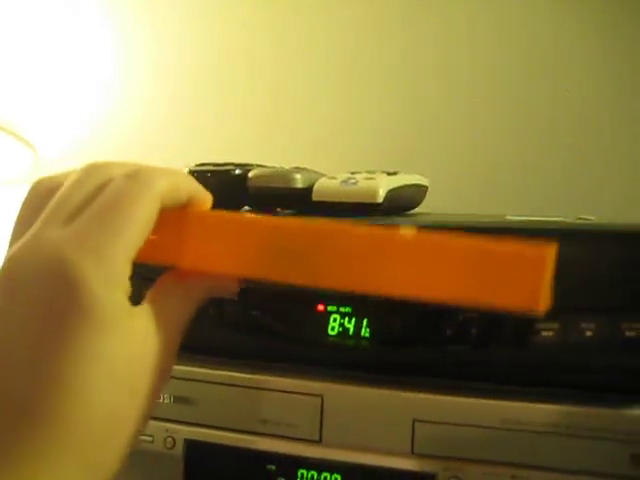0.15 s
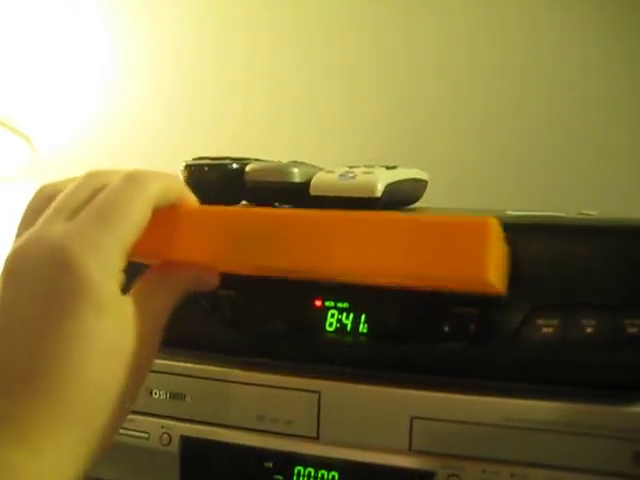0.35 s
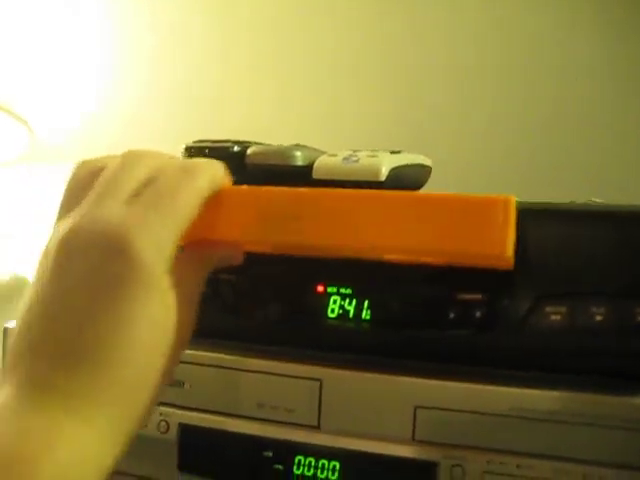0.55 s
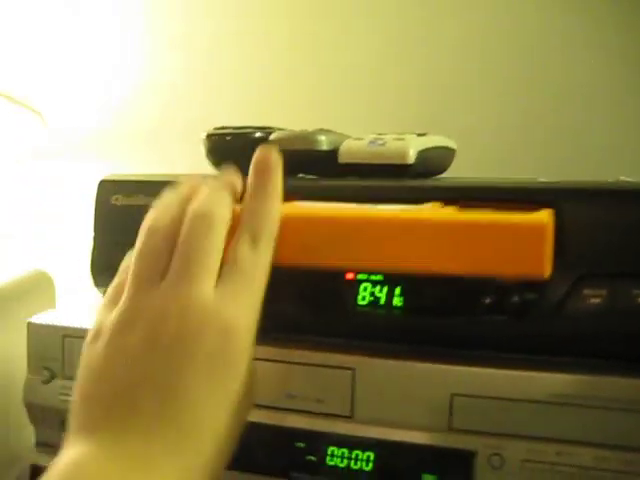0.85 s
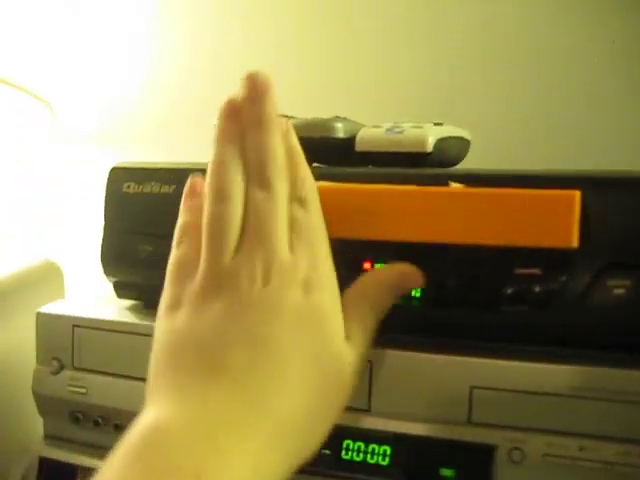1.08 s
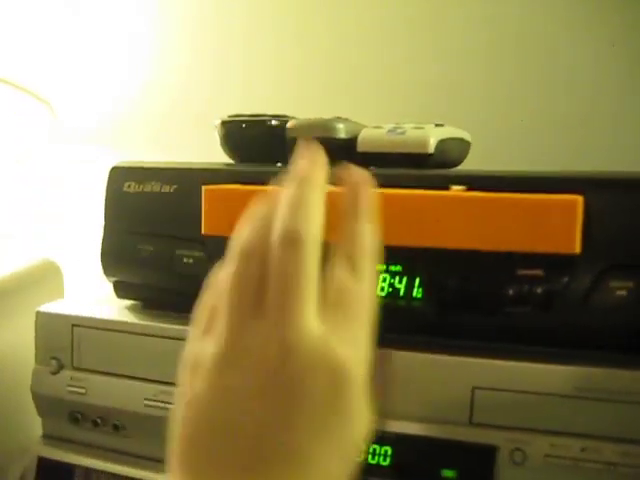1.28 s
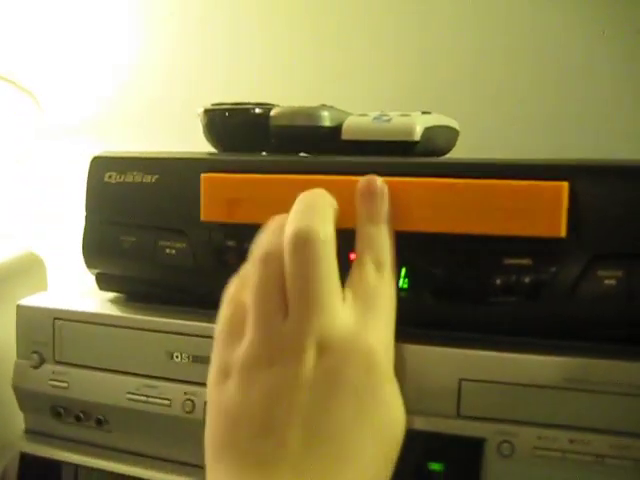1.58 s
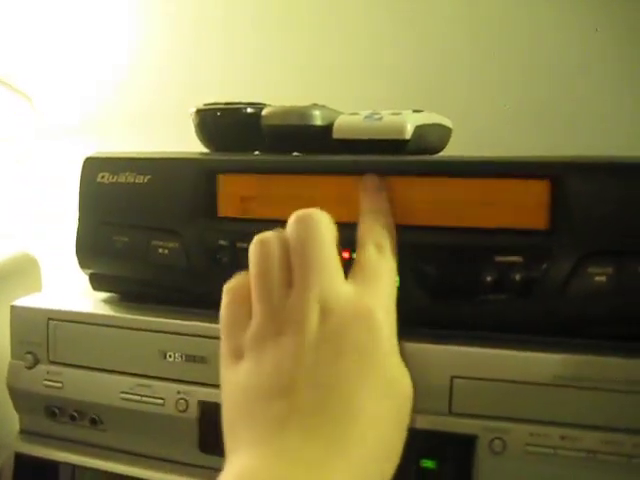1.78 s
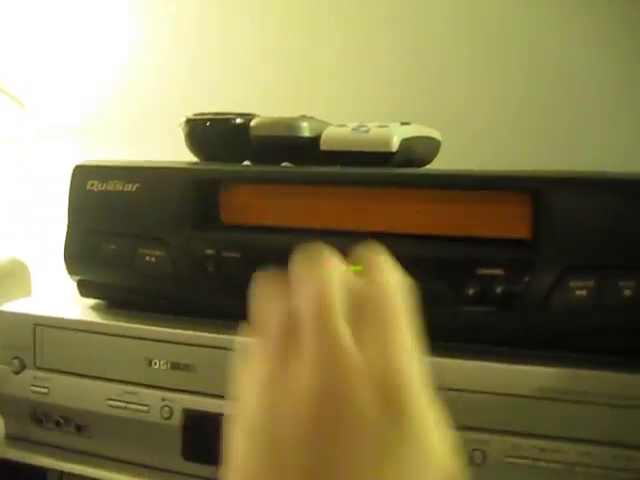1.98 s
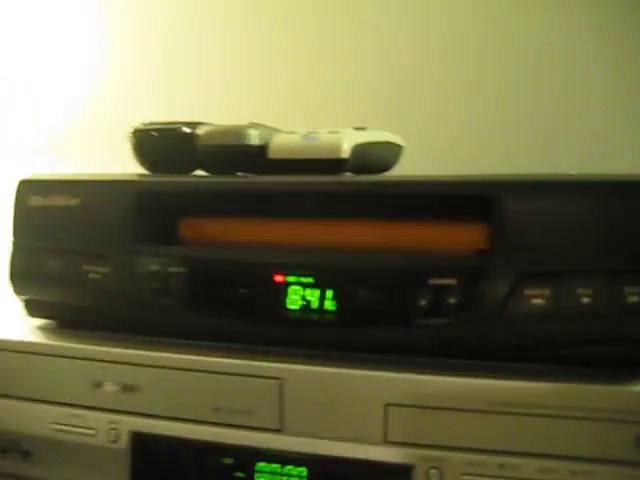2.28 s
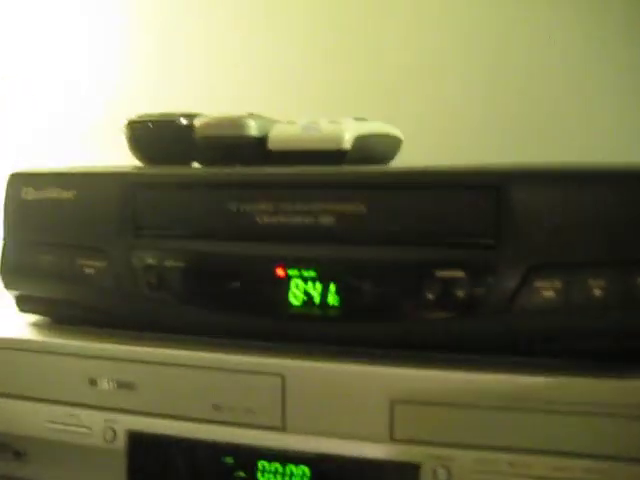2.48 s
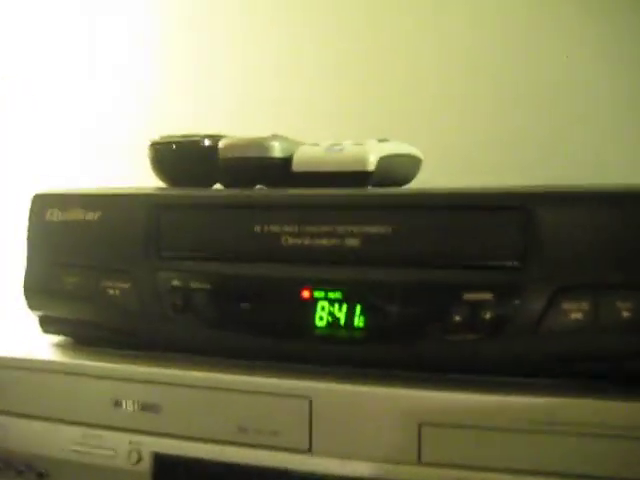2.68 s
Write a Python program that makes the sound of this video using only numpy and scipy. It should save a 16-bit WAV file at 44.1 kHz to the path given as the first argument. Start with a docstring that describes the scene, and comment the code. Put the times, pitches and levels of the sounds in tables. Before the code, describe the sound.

Video cassette loading into a tape machine: sharp plastic clacks, scraping, gear whirr, final clunks

```python
"""Loading a cassette into a video recorder

A plastic cassette is knocked against the slot, slid in and pushed home; the motor draws it in and
lowers it with rattles and clunks, the flap falls shut, and the motor whines on over a faint hum.
Contacts are decaying noise bursts; rattling, sliding and gears are trains of random tiny impacts.
Most of these excite the modes of shell and cabinet and a small room; a few dry ticks do not.
Struck modes are decaying sines, the motor and the hum unsteady sines."""
import sys
import numpy as np
from scipy import signal
from scipy.fft import rfft, irfft
from scipy.io import wavfile
from scipy.ndimage import uniform_filter1d

SR = 44100
rng = np.random.default_rng(int(sys.argv[2]) if len(sys.argv) > 2 else 0)


def generate_wav(sig):
    """Save sig (samples, or channels by samples) to the path in sys.argv[1] as 16-bit PCM at SR."""
    pcm = np.round(np.clip(np.atleast_2d(sig).T, -1, 1) * 32767).astype(np.int16)
    wavfile.write(sys.argv[1], SR, pcm)


N = 125685  # samples

# Levels are relative: later gains, resonances and filters act on them.
# centres of the contact bands: (frequency [Hz])
CONTACT_HZ = (350, 900, 2200, 4900, 11000)
# single sharp contacts: (time [s], ring t60 [s], level in each contact band [dB] x 5)
CLACKS = [(0.2165, 0.052, -10, -6, -10.5, -3, -16), (0.3237, 0.038, -22.5, -16.5, -11, -1, -10.5),
          (.603, 0.048, -51, -39, -28, -28, -28.5), (0.7392, 0.028, -10.5, 3.5, -10, 5.5, -12),
          (0.757, 0.13, -22, -11, -11.5, -11, -18.5), (.784, 0.066, -19, -14, -10, -1, -13),
          (1.106, 0.15, -17, -25, -27, -30.5, -44), (1.145, 0.043, -18.5, -14.5, -21, -28, -43),
          (1.576, 0.038, -45, -16, -27, -21.5, -31), (1.816, 0.1, -27, -17, -16.5, -16, -28.5),
          (2.357, 0.14, -19, -14.5, -16, -15.5, -30), (2.3803, 0.041, -10.5, -16, -4, -7, -8.5),
          (2.489, 0.099, -10, -13, -12, -14, -19), (2.571, 0.059, -20, -19, -15, -17.5, -23)]
# dry ticks, without cabinet or room; the one at 2.4893 s is the sharp onset of the 2.489 s clack:
# (time [s], ring t60 [s], level in each contact band [dB] x 5)
DRY_TICKS = [(1.272, 0.015, -36, -50, -68, -20, -30), (2.4893, 0.0084, -17, -13, -1, -2, -7),
             (2.615, 0.021, -35, -12, -14, -13, -27)]
CLACK_ATTACK_S, CLACK_GAIN_DB = 0.00018, -0.5
# spectrum edges: 60 Hz against the lowest contact band, 16 kHz against the highest
BASS_DB, TOP_DB = -37.5, -9.5

# parts that judder against each other: (time [s], length [s], level in each contact band [dB] x 5)
RATTLES = [(0.247, 0.038, -27.5, -23.5, -26, -26.5, -41.5), (0.354, 0.02, -24, -10.5, -23, -14, -32),
           (.383, 0.0085, -16.5, -14, -13.5, -9.5, -15.5), (.429, 0.025, -19, -17, -20.5, -16, -26.5),
           (0.505, 0.021, -21, -9.5, -17, -16.5, -34), (.526, 0.0057, -13, -19, -9, -11.5, -20.5),
           (.565, 0.01, -25, -35, -27.5, -25, -33), (0.893, 0.047, -21, -21, -31, -24.5, -36),
           (.951, 0.015, -12, -13.5, -25, -23, -33.5), (1.33, 0.024, -31.5, -27.5, -36, -34, -45.5),
           (1.656, 0.013, -28, -16.5, -12.5, -17, -16.5), (1.677, 0.0082, -20, -11.5, -21, -15.5, -33),
           (1.69, 0.015, -27, -16, -21.5, -19, -31.5), (1.749, 0.018, -24, -28, -25.5, -26, -37),
           (1.892, 0.013, -34, -33, -23.5, -26.5, -43), (2.005, 0.011, -30.5, -45, -28, -31.5, -35),
           (2.096, 0.022, -25.5, -18.5, -13, -9, -24.5), (2.214, .018, -27.5, -34, -26.5, -28.5, -40),
           (2.265, 0.011, -35, -21, -21.5, -17.5, -35), (2.387, 0.027, -30, -18, -18, -22, -24.5)]
RATTLE_PER_S, RATTLE_SCATTER_DB, RATTLE_T60_S, RATTLE_SWELL_S = 1100, 2.5, 0.023, 0.003
CARRIAGE_GAIN_DB = 1  # common gain of rattles and squeaks

# modes of the free shell, rung by the first knock: (frequency [Hz], t60 [s], level [dB])
SHELL_MODES = [(767, 0.096, -14.5), (3380, 0.1, -20), (3580, 0.01, -1)]
# heaviest blows, which shake the whole machine: (time [s], frequency [Hz], level [dB])
THUDS = [(0.737, 137, -32.5), (2.377, 101, -34.5)]
THUD_T60_S = 0.08

# shell rubbing along the guides: (time [s], level [dB])
SLIDE_LEVEL = [(.33, -27), (.46, -22.5), (.55, -24), (.63, -40), (.73, -27.5), (.84, -28.5), (.985, -31),
               (1.05, -42), (1.2, -55), (1.37, -48), (1.43, -25), (1.495, -37.5), (1.525, -24.5),
               (1.57, -37.5), (1.655, -19.5), (1.73, -40.5), (1.84, -23)]
# spectrum of the rubbing: (frequency [Hz], level [dB])
SLIDE_COLOUR = [(60, -22.5), (200, -6), (380, -0.5), (900, 0), (2200, -6), (5000, -4.5), (11000, -13),
                (16000, -21)]
SLIDE_PER_S, SLIDE_SCATTER_DB, SLIDE_T60_S = 630, 3, 0.041

# loading gears: (time [s], level [dB])
GEAR_LEVEL = [(1.82, -53), (1.92, -33.5), (2.03, -34), (2.19, -38.5), (2.33, -29), (2.64, -43.5),
              (2.68, -35), (2.76, -51)]
# spectrum of the gears: (frequency [Hz], level [dB])
GEAR_COLOUR = [(100, -13.5), (450, 7), (1200, -4.5), (1700, -1.5), (2600, -4), (5000, -5), (11000, -10),
               (16000, -22)]
GEAR_PER_S, GEAR_SCATTER_DB, GEAR_T60_S = 550, 3, 0.02

# carriage lever scuffing along its cam: (time [s], length [s], level [dB])
SCUFFS = [(1.961, 0.0046, -22), (1.977, 0.0067, -13.5), (2.754, 0.0097, -20.5)]
# modes of the lever: (frequency [Hz], width [Hz], gain [dB])
LEVER_MODES = [(1696, 460, 2.5), (2200, 450, -3.5), (2830, 800, -5.5)]

# squeaks of the carriage; their level is before the carriage gain
SQUEAK_SPAN_S, SQUEAK_RANGE_HZ = (2.29, 2.35), (5500, 10000)
SQUEAK_T60_S, SQUEAK_DB = 0.02, -34

# loading motor: (time [s], whine frequency [Hz], level [dB])
MOTOR = [(2.2, 1170, -56), (2.6, 1172, -44), (2.65, 1162, -50.5), (2.77, 1150, -57), (2.79, 1146, -43.5),
         (2.85, 1114, -47)]
WHINE_WAVER = 0.001  # share of the frequency

# modes of cassette and cabinet: (frequency [Hz], width [Hz], gain [dB])
BODY_MODES = [(409.4, 23.3, 8.5), (722, 23, 4), (832, 35.4, 7.5), (1206, 107, 11), (1637, 40, 7.5),
              (2050, 380, 1), (2655, 370, -3.5), (3340, 68, -4), (5410, 130, -7)]
BODY_DIRECT_DB = 0.5
# upper modes shift as the cassette is held differently (standard deviation, share of frequency)
MODE_SHIFT = 0.025

# diffuse tail of the room by band: (frequency [Hz], level [dB], t60 [s])
ROOM_BANDS = [(363, -1.5, 0.43), (980, -4, 0.15), (2340, -7.5, 0.16), (5400, -14.5, 0.13),
              (11100, -13, 0.13)]
ROOM_DELAY_S, ROOM_BUILD_S = 0.0074, 0.0038

# spectrum of the hiss: (frequency [Hz], spectral density [dB per Hz])
AIR_COLOUR = [(30, -18), (962, -13), (1220, -22.5), (1670, -10), (2060, -21), (16000, -35.5)]
AIR_DB = -47
# tones of the steady hum: (frequency [Hz], level [dB])
HUM = [(1082, -63), (1717, -62)]
HUM_WAVER = 0.0054  # share of the frequency

# microphone response: (frequency [Hz], gain [dB])
MIC_RESPONSE = [(6300, -0.5), (7450, -7), (7900, -20.5), (8150, -14), (8700, -4.5), (11500, 2),
                (16000, -6.5)]
CUTOFF_HZ = 16100


def clacks(rows, through_cabinet, size=8192):
    """Impact excitation: edges, latches and the flap strike once, as noise that decays exponentially."""
    out, t = np.zeros(N), np.arange(size) / SR
    attack = np.minimum(t / CLACK_ATTACK_S, 1)
    for start, t60, *band_dbs in rows:
        ring = rng.standard_normal(size) * fade(t, t60) * attack
        hit = contact(ring, band_dbs)
        add(out, start, cabinet(hit) if through_cabinet else hit)
    return undb(CLACK_GAIN_DB) * out


def rattles(size=8192):
    """Repeated impact: loose reels and the carriage bounce in quick runs that swell as the parts meet."""
    out = np.zeros(N)
    swell = np.sqrt(np.minimum(np.arange(size) / SR / RATTLE_SWELL_S, 1))
    for start, length, *band_dbs in RATTLES:
        run = chatter(int(length * SR), RATTLE_PER_S, RATTLE_SCATTER_DB, RATTLE_T60_S, size)
        add(out, start, cabinet(contact(swell * run, band_dbs)))
    return undb(CARRIAGE_GAIN_DB) * out


def contact(x, band_dbs):
    """Spectral shaping: a contact is set by its own balance of thump, body and crack."""
    bass = (60, band_dbs[0] + BASS_DB)
    top = (16000, band_dbs[-1] + TOP_DB)
    return colour(x, [bass, *zip(CONTACT_HZ, band_dbs), top])


def knocks():
    """Free modal decay: the hand-held shell rings hollow and the chassis thuds as damped sines."""
    out = np.zeros(N)
    first_knock = CLACKS[0][0]
    for hz, t60, db in SHELL_MODES:
        add(out, first_knock, ping(hz, t60, db))
    for start, hz, db in THUDS:
        add(out, start, ping(hz, THUD_T60_S, db))
    return out


def slide():
    """Stick-slip friction: the shell moves along the guides in many tiny slips."""
    slips = chatter(N, SLIDE_PER_S, SLIDE_SCATTER_DB, SLIDE_T60_S, N)
    return colour(slips * gain_curve(SLIDE_LEVEL), SLIDE_COLOUR)


def scuffs():
    """Resonant stick-slip: brief slips drive the lever's modes twice over, giving a rounded chirp."""
    slips = np.zeros(N)
    for start, length, db in SCUFFS:
        run = chatter(int(length * SR), RATTLE_PER_S, RATTLE_SCATTER_DB, RATTLE_T60_S, N)
        add(slips, start, undb(db) * run)
    return resonate(resonate(slips, LEVER_MODES), LEVER_MODES)


def squeaks(count=14):
    """High-mode excitation: the sinking carriage gives off tiny damped sines just before it lands."""
    out = np.zeros(N)
    for when, pitch in rng.random((count, 2)):
        start = np.interp(when, (0, 1), SQUEAK_SPAN_S)
        hz = np.interp(pitch, (0, 1), SQUEAK_RANGE_HZ)
        add(out, start, ping(hz, SQUEAK_T60_S, SQUEAK_DB))
    return undb(CARRIAGE_GAIN_DB) * out


def gears():
    """Tooth impact: plastic gear teeth whirr as a dense train of tiny uneven blows."""
    teeth = chatter(N, GEAR_PER_S, GEAR_SCATTER_DB, GEAR_T60_S, N)
    return colour(teeth * gain_curve(GEAR_LEVEL), GEAR_COLOUR)


def motor():
    """Rotational tone: the small motor's whine sags in frequency under load."""
    return tone(curve(MOTOR), WHINE_WAVER) * gain_curve(MOTOR, axis=2)


def cabinet(x):
    """Modal resonance: the two lowest modes stay put, the others shift a little at each excitation."""
    lowest, second, *upper = BODY_MODES
    shifted = [(hz * (1 + MODE_SHIFT * rng.standard_normal()), width, db) for hz, width, db in upper]
    return undb(BODY_DIRECT_DB) * x + resonate(x, [lowest, second] + shifted)


def room(x, size=24000):
    """Diffuse reverberation: a noise tail decays band by band, the lows lasting longest."""
    t = np.arange(size) / SR
    f = np.maximum(np.fft.rfftfreq(size, 1 / SR), 1)
    log_centres = np.log(np.array(ROOM_BANDS)[:, 0])
    build = np.clip((t - ROOM_DELAY_S) / ROOM_BUILD_S, 0, 1)
    noise, tail = rfft(rng.standard_normal(size)), 0
    # each row of the identity selects one band, crossfading into its neighbours
    for share, (_, db, t60) in zip(np.eye(len(ROOM_BANDS)), ROOM_BANDS):
        band = irfft(noise * np.interp(np.log(f), log_centres, share))
        envelope = fade(t, t60) * build
        tail = tail + undb(db) * band * envelope / np.linalg.norm(envelope)
    return x + signal.fftconvolve(x, tail)[:N]


def background():
    """Stationary noise and tones: soft hiss and the hum of idling equipment."""
    air = colour(rng.standard_normal(N), AIR_COLOUR)
    hum = sum(undb(db) * tone(hz, HUM_WAVER) for hz, db in HUM)
    return undb(AIR_DB) * air / air.std() + hum


def chatter(count, per_s, scatter_db, t60, size):
    """Random impact train: uneven blows over count samples, each ringing as noise; rms 1 while they last."""
    hit = rng.random(size) < per_s / SR
    hit[0], hit[count:] = True, False
    scatter = scatter_db * np.clip(rng.standard_normal(size), -2, 2)
    energy = hit * undb(scatter) ** 2
    keep = fade(1 / SR, t60) ** 2  # share of power kept per sample
    power = signal.lfilter([1 - keep], [1, -keep], energy * count / energy.sum())
    return np.sqrt(power) * rng.standard_normal(size)


def ping(hz, t60, db):
    """Damped oscillation: one struck mode whose onset grows over its first cycle."""
    t = np.arange(SR // 4) / SR
    onset = np.minimum(t * hz, 1)
    return undb(db) * np.sin(2 * np.pi * hz * t) * fade(t, t60) * onset


def resonate(x, modes):
    """Modal superposition: x drives a sum of (frequency [Hz], width [Hz], gain [dB]) resonances."""
    return sum(undb(db) * signal.lfilter(*signal.iirpeak(hz, hz / width, fs=SR), x)
               for hz, width, db in modes)


def tone(hz, waver, rate=25):
    """Frequency modulation: a sine of rms 1 whose frequency drifts at random."""
    k = int(SR / rate)
    drift = uniform_filter1d(np.repeat(rng.standard_normal(N // k + 1), k), k)[:N]
    phase = 2 * np.pi * np.cumsum(hz * (1 + waver * drift)) / SR
    return np.sqrt(2) * np.sin(phase)


def colour(x, points, size=2048):
    """Minimum-phase filtering: a causal response through (frequency [Hz], gain [dB]) points."""
    hz, db = np.array(sorted(points)).T
    f = np.maximum(np.fft.rfftfreq(size, 1 / SR), 1)
    cepstrum = irfft(np.log(undb(np.interp(np.log(f), np.log(hz), db))))
    # folding the cepstrum onto positive time makes the filter causal
    cepstrum[1:size // 2] *= 2
    cepstrum[size // 2 + 1:] = 0
    impulse = irfft(np.exp(rfft(cepstrum)))
    return signal.fftconvolve(x, impulse)[:len(x)]


def fade(t, t60):
    """Exponential decay: the level falls by 60 dB in t60 seconds."""
    return np.exp(-np.log(1000) * t / t60)


def undb(db):
    """Logarithmic level: decibels to amplitude gain."""
    return 10 ** (np.asarray(db) / 20)


def curve(rows, axis=1):
    """Linear interpolation: one column of a table, joined by straight lines in time."""
    rows = np.array(rows)
    return np.interp(np.arange(N) / SR, rows[:, 0], rows[:, axis])


def gain_curve(rows, axis=1):
    """Level envelope: a dB column as gain, silent before its first and after its last point."""
    t = np.arange(N) / SR
    return undb(curve(rows, axis=axis)) * (t >= rows[0][0]) * (t <= rows[-1][0])


def add(out, start, x):
    """Superposition: mix x into out at a time in seconds."""
    i = max(int(start * SR), 0)
    out[i:i + len(x)] += x[:max(N - i, 0)]


def scene():
    """Superposition of sources: five groups each excite a room tail of their own, the rest stays dry."""
    roomy = (
        clacks(CLACKS, through_cabinet=True),
        rattles() + cabinet(squeaks()),
        cabinet(slide()),
        cabinet(gears()),
        scuffs(),
    )
    dry_ticks = clacks(DRY_TICKS, through_cabinet=False)
    mix = sum(room(part) for part in roomy) + dry_ticks + knocks() + motor() + background()
    return mix[None]


def record(dry):
    """Transducer response: a small microphone with a notch near 8 kHz clips peaks and loses the top."""
    heard = np.clip(colour(dry[0], MIC_RESPONSE), -1, 1)
    lowpass = signal.ellip(10, 0.2, 70, CUTOFF_HZ, fs=SR, output="sos")
    return signal.sosfilt(lowpass, heard)[None]


dry = scene()
out = record(dry)
generate_wav(out)
```